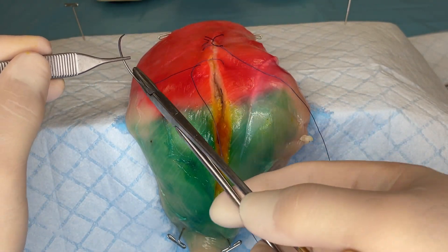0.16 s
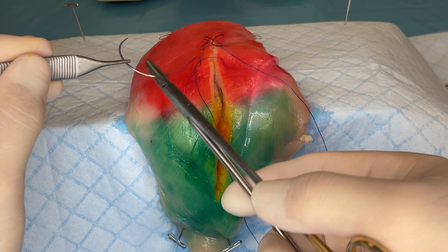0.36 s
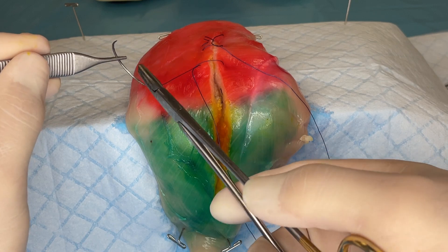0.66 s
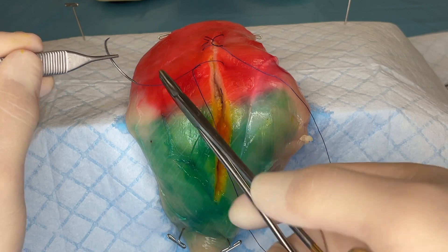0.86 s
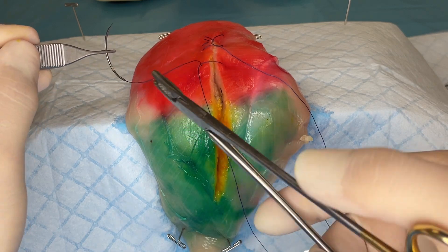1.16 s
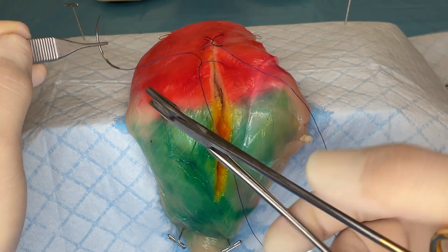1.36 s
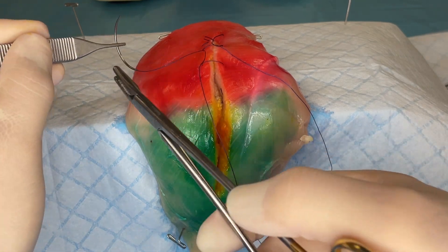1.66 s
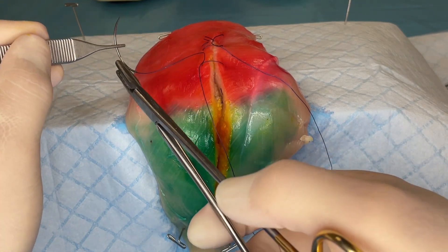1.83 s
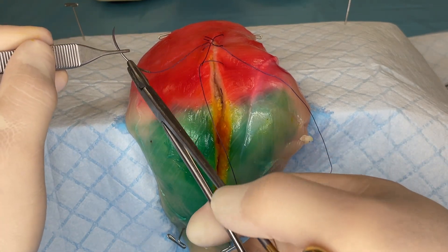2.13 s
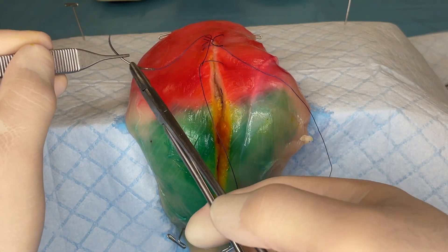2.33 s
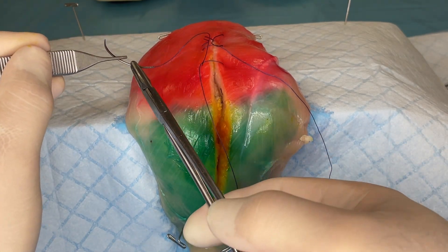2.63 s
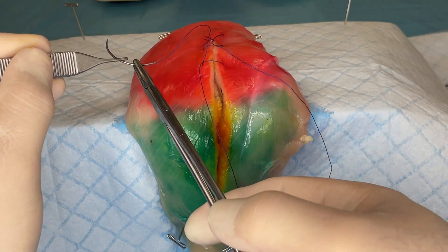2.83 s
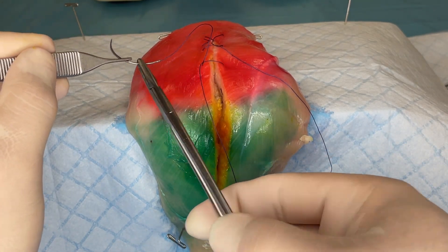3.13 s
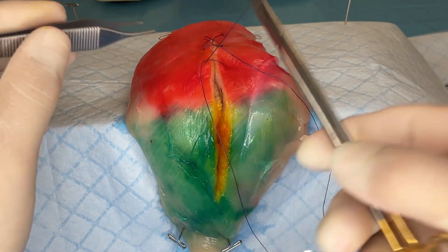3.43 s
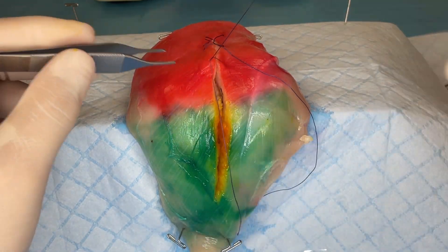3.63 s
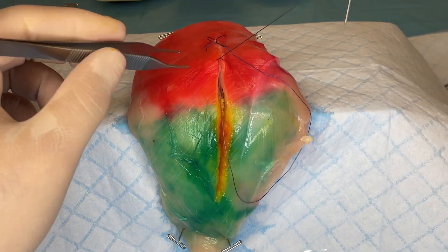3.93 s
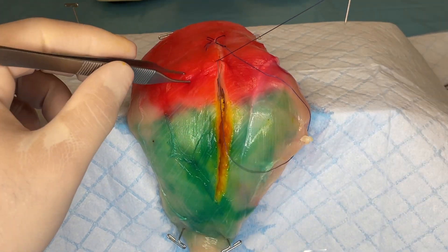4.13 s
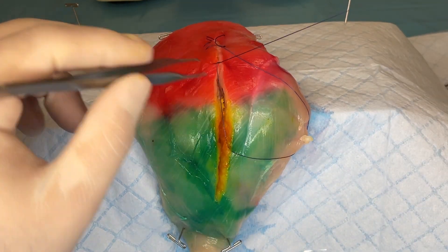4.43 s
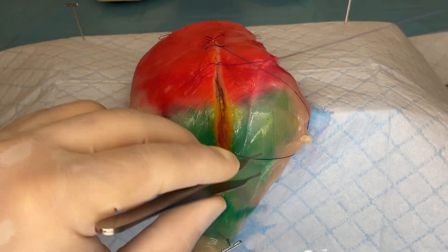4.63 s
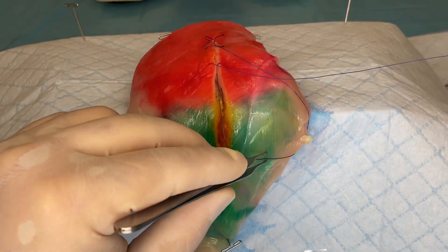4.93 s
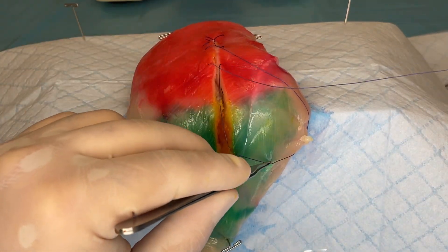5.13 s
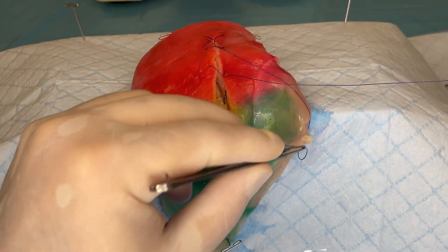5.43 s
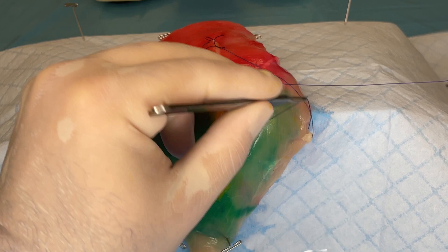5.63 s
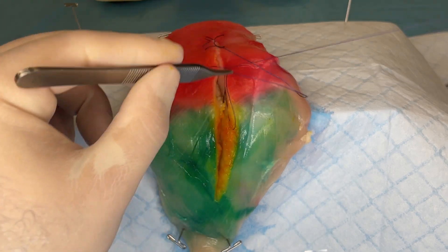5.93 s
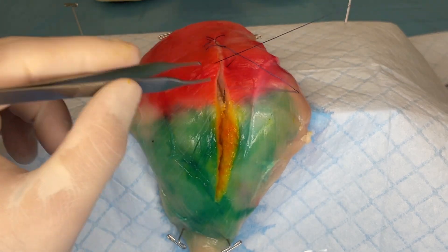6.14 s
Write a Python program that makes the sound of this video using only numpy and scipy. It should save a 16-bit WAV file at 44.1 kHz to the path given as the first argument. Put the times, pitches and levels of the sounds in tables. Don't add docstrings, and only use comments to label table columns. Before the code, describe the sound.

A close stereo phone microphone in a small quiet room, with faint hiss and soft low air rumble throughout. Tiny steel ticks open at 0 s; a short squeak and scrape at 0.2 s with low buffets around 0.3-0.4. A sharp click lands at 0.59, then the loose joint rattles from 0.7 to 0.9. Duller metal knocks and a scrape follow at 0.97-1.14, then near stillness. Light ticks return at 2.07-2.17, with low bumps at 2.2-2.4, bright clicks at 2.36-2.4 and another near 2.76. Small clicks at 3.14 lead into two hard, ringing ratchet snaps at 3.20 and 3.25, a softer one at 3.32 and a fading scrape. Thread rubs with a thin high hiss from 3.45 to 4.05. A heavy low buffet thumps at 4.02, with sleeve brushing around it and dull padded pats at 4.4-4.55 and 5.04. Soft cloth drags at 5.2-5.7; faint ticks at 5.87 and 6.13 end it.

```python
import sys
import numpy as np
from scipy import signal
from scipy.fft import rfft, irfft
from scipy.io import wavfile
from scipy.ndimage import uniform_filter1d

SR = 44100
rng = np.random.default_rng(int(sys.argv[2]) if len(sys.argv) > 2 else 0)


def invert_db(level):
    return 10 ** (np.asarray(level, dtype=float) / 20)


def output_pcm(signal):
    pcm = np.clip(np.atleast_2d(signal).T, -1, 1) * 32767
    wavfile.write(sys.argv[1], SR, np.round(pcm).astype(np.int16))


N = 277389


def shape(points):
    hz, value = np.transpose(points)
    return np.interp(np.log(np.fft.rfftfreq(N, 1 / SR) + 1), np.log(hz), value)


def band(x, lo_hz, hi_hz, order=2):
    return signal.sosfilt(signal.butter(order, [lo_hz, min(hi_hz, .45 * SR)], "band", fs=SR, output="sos"), x)


def noise(lo_hz, hi_hz):
    x = band(rng.standard_normal(N), lo_hz, hi_hz, order=4)
    return x / x.std()


def unit(x):
    return x / np.sqrt(np.sum(x ** 2))


def decay(t, t60):
    return np.exp(-np.log(1000) * t / t60)


def mode(x, hz, t60):
    pole = np.exp(2j * np.pi * hz / SR - np.log(1000) / (t60 * SR))
    return signal.lfilter([1, -1], [1, -pole], x).imag


def add(out, piece, s):
    i = max(int(s * SR), 0)
    out[..., i:i + piece.shape[-1]] += piece[..., :N - i]


# frequency [Hz], level [dB per Hz].
AIR = [(150, -18.5), (220, -4.5), (300, -3), (650, -12), (1500, -20), (2750, -22), (6700, -28), (8200, -26),
       (11000, -32.5), (13500, -36.5), (16500, -48)]
# frequency [Hz], side minus mid [dB].
AIR_SIDE = [(200, -9), (380, -6), (700, -8.5), (1300, -5.5), (2000, -2), (2600, -20.5), (5000, -30)]


def air():
    level_db = -80
    above_rumble = np.fft.rfftfreq(N, 1 / SR) > 150
    mid, side = rfft(rng.standard_normal((2, N))) * invert_db(shape(AIR)) * above_rumble
    mid, side = irfft(mid, N), irfft(side * invert_db(shape(AIR_SIDE)), N)
    return np.array([mid, side]) * invert_db(level_db) / band(mid, 360, 16000).std()


# peak time [s], peak level [dB], flutter above the rumble [dB].
GUSTS = [(0.01, -48, -18), (0.308, -45, -19), (.42, -58, -16), (0.769, -53, -19), (.93, -73, -26),
         (1.029, -61, -32), (1.26, -54.5, -22), (1.488, -53.5, -5.5), (1.6, -50, -14), (2.21, -52.5, -4.5),
         (2.26, -32, -23), (2.44, -45, -17.5), (2.52, -47, -28), (2.66, -54, -27), (2.82, -53.5, -35),
         (2.99, -59, -35), (3.241, -52, 1), (3.398, -61.5, 0.5), (3.72, -58, -2.5), (4.084, -37.5, -16),
         (4.14, -36, -12), (4.26, -45.5, -23.5), (4.61, -75, -4.5), (4.72, -71, -14), (4.941, -62, -24.5),
         (5.08, -74.5, 1), (5.448, -54.5, -20.5), (5.66, -61.5, -6.5), (5.969, -63, -16.5),
         (6.28, -56, -9.5)]


def airflow():
    still_db, still_flutter_db, flicker_db = -57.5, -68.5, 2
    gust_rise_s, gust_fall_s = 0.046, 0.019
    shut_s, attack_s, hold_s, release_s, open_s = 4.32, 0.14, .13, 0.4, 5.27
    depth_db, upper_depth_db, flutter_share = -32.5, -11, 0.81
    t = np.arange(0, N + 64, 64) / SR
    shut = np.clip((t - shut_s) / attack_s, 0, 1)
    since_hold = np.maximum(t - shut_s - attack_s - hold_s, 0)
    shut_db = depth_db * shut * np.exp(-since_hold / release_s)
    restless = uniform_filter1d(uniform_filter1d(rng.standard_normal((2, len(t))), 40), 40) * 2.4
    low = invert_db(still_db + shut_db + flicker_db * restless[0])
    flutter = invert_db(still_flutter_db + flutter_share * shut_db + flicker_db * restless[1])
    for s, db, flutter_db in GUSTS:
        gust = invert_db(db) * np.exp(-((t - s) / np.where(t < s, gust_rise_s, gust_fall_s)) ** 2)
        low = np.hypot(low, gust)
        flutter = np.hypot(flutter, gust * invert_db(flutter_db))
    upper = low * invert_db(upper_depth_db * shut * np.clip((open_s - t) / attack_s, 0, 1))
    return [np.interp(np.arange(N) / SR, t, v) for v in (low, upper, flutter)]


# start [s], peak [dB], pitch [Hz], length [cycles].
BUFFETS = [(0.281, -31, 62, 3.9), (0.387, -33, 55.4, 3.1), (2.207, -35, 84, 13), (2.232, -29, 98.3, 5.3),
           (2.393, -33, 52.4, 2.4), (4.019, -12, 90, 3.18), (4.023, -25, 204, 3.4),
           (4.121, -36.5, 148.7, 2.2), (4.108, -22, 58.4, 4), (4.239, -35, 69.8, 4),
           (4.299, -38.5, 62.2, 3)]


def draught():
    low, upper, flutter = airflow()
    mid = low * noise(36, 68) + upper * invert_db(-8.0) * noise(68, 115)
    mid = mid + flutter * (noise(97, 210) + invert_db(-10.0) * noise(210, 340))
    side = low * invert_db(-17.0) * noise(42, 73) + flutter * invert_db(-9.0) * noise(160, 200)
    t, eddies = np.arange(SR // 4) / SR, np.zeros(N)
    for s, db, hz, cycles in BUFFETS:
        u = t * hz / cycles
        swell = (2.755 * u * np.exp(1 - 2.796 * u)) ** 3.2
        turns = hz * t * (1 + 1.127 * np.exp(-.5 * t * hz))
        add(eddies, invert_db(db - 5.5) * np.sin(2 * np.pi * turns) * swell, s)
    lag_ms = 0.53
    mid, side = mid + eddies, side + np.gradient(eddies) * SR * lag_ms / 2000
    low_cut = signal.butter(2, 47, "high", fs=SR, output="sos")
    return signal.sosfilt(low_cut, np.array([mid + side, mid - side]))


# start [s], length [s], level [dB].
BRUSH = [
    (-.1, 0.56, -67.5),
    (0.208, 0.053, -62.5),
    (3.4, 0.41, -65),
    (3.854, 0.23, -57.5),
    (4.09, 0.06, -63),
    (4.155, 0.15, -67),
    (5.196, 0.22, -63.5),
    (5.459, 0.29, -66),
]
# start [s], peak [dB], decay t60 [s], edge [dB].
PATS = [
    (4.027, -63, 0.05, -21.5),
    (4.425, -60.5, 0.14, -9.5),
    (4.504, -53.5, 0.092, -16.5),
    (4.545, -58, 0.14, -16.5),
    (5.042, -55, 0.068, -18),
]
# frequency [Hz], width [Hz], level [dB].
PAD = [(287, 95, 0.5), (367, 30, -7.5), (494, 47, -4.5), (604, 63, 0)]


def brush():
    t, out = np.arange(N) / SR, np.zeros(N)
    rub = noise(267, 340) + invert_db(-11.0) * noise(410, 596)
    for s, length, db in BRUSH:
        out = out + invert_db(db - 7) * np.sin(np.pi * np.clip((t - s) / length, 0, 1)) * rub
    t = t[:SR // 4]
    for s, db, t60, edge_db in PATS:
        force = rng.standard_normal(len(t)) * decay(t, t60) * (1 - np.exp(-t / 0.00235))
        thud = sum(invert_db(g) * unit(band(force, hz - w / 2, hz + w / 2)) for hz, w, g in PAD)
        thud = thud + invert_db(edge_db) * unit(band(force, 700, 2600))
        add(out, thud * invert_db(db) / np.abs(thud).max(), s)
    return out * invert_db(np.array([[1.2], [-1.2]]))


# frequency [Hz], level [dB], decay t60 [s].
ROOM = [(730, -47.5, 0.46), (1420, -48, .33), (2491, -56, 0.61), (4060, -46.5, 0.26), (6000, -47.5, 0.27),
        (11000, -49, 0.3), (14275, -48.5, 0.19)]


def room(x):
    t = np.arange(SR) / SR
    tail = 0
    for hz, db, t60 in ROOM:
        wash = band(rng.standard_normal(SR), hz / 1.7, hz * 1.1) * decay(t, t60)
        tail = tail + invert_db(db) * wash * (1 - np.exp(-t / .004))
    return signal.fftconvolve(x, tail)[:N]


# time [s], strength of pull [dB].
THREAD = [
    (3.44, -100),
    (3.498, -76),
    (3.58, -73.5),
    (3.654, -82.5),
    (3.73, -72.5),
    (3.8, -81),
    (3.88, -75.5),
    (3.96, -79),
    (4.06, -100),
]
# frequency [Hz], width [Hz], level [dB].
THREAD_RINGS = [(2547, 260, -5), (5898, 400, -5.5), (8060, 3000, 2), (8900, 150, -7), (9700, 300, -6.5),
                (11006, 2500, -10), (14200, 500, -12)]


def thread():
    sing_hz, rise_hz, taut_s, sing_db = 7100, 520, 0.54, -3
    rub_db, rub_fade_db_s = -1, 37
    s, db = np.transpose(THREAD)
    t = np.arange(N) / SR
    since = np.clip(t - s[0], 0, 1)
    hz = sing_hz + rise_hz * np.sin(np.pi / 2 * np.clip(since / taut_s, 0, 1))
    rough = invert_db(sing_db + 4.1 * noise(7.7, 40)) * noise(4, 170)
    sing = rough * np.sin(2 * np.pi * np.cumsum(hz) / SR)
    rub = 0
    for ring_hz, width, ring_db in THREAD_RINGS:
        fitful = invert_db(ring_db + 3.3 * noise(4.5, 22) + 3.5 * noise(30, 150))
        rub = rub + fitful * noise(ring_hz - width / 2, ring_hz + width / 2)
    pull = invert_db(np.interp(t, s, db, -150, -150))
    return pull * (sing + invert_db(rub_db - rub_fade_db_s * since) * rub)


# start [s], length [s], level [dB], slip rate [Hz].
SQUEAKS = [(0.214, 0.049, -70.5, 2314), (0.274, 0.026, -83.5, 2300), (0.41, 0.034, -79, 11300),
           (0.602, 0.15, -91.5, 11900), (0.796, 0.057, -90, 11600), (0.863, 0.041, -72.5, 11600),
           (1.104, 0.049, -72, 11750), (0.591, .035, -69.5, 2300), (2.073, 0.056, -84, 15300),
           (2.27, 0.037, -92, 15300), (2.931, 0.037, -93, 15160), (3.849, .125, -101, 15200),
           (4.02, 0.027, -91, 12000), (4.9, .11, -90, 14200), (5.04, .11, -99, 15200),
           (5.187, .11, -95, 15270), (4.903, .02, -90, 11310), (4.97, 0.058, -83, 11410),
           (5.188, 0.042, -90, 11560), (6.13, 0.017, -88, 11380)]


def squeaks():
    out, t = np.zeros(N), np.arange(SR // 8) / SR
    for s, length, db, hz in SQUEAKS:
        uneven_db = 6.2 * np.repeat(rng.standard_normal(SR // 800 + 1), 100)[:SR // 8]
        slips = rng.standard_normal(SR // 8) * invert_db(uneven_db)
        slips = slips * np.sin(np.pi * np.clip(t / length, 0, 1))
        tone = band(slips, hz / 1.025, hz * 1.025)
        if hz < 8000:
            tone = tone + invert_db(-12.5) * band(slips, hz * 1.9, hz * 2.05)
        add(out, invert_db(db) * unit(tone) * np.sqrt(length * SR), s)
    return out


# start [s], peak [dB], treble [dB per octave], contact [ms].
JIGGLES = [(.6873, -44.5, -7, 1.6), (0.71, -45.5, 5, 1.7), (0.7115, -50, 9, 1.84), (0.7857, -44.5, 13, 1.4),
           (0.79, -51, 3, 2.7), (.8264, -66, 12, 3.5), (0.874, -60, 10, 3), (.8889, -50, 9, 1.3),
           (.894, -55, 2, 1.6), (0.901, -57, 2, 1.5), (0.9137, -47, -5.5, 1.9), (.919, -60, -3, 2.5),
           (2, -59, 5, 1.5), (2.044, -67, 14, 1.7), (2.134, -65, 8, 1.7), (2.232, -66, 8, 2.2),
           (2.774, -60, 4, 2), (2.887, -65, 8, 3)]
# frequency [Hz], width [Hz], level [dB].
JOINT = [(3300, 380, -18), (5190, 280, -2), (7700, 450, -7), (8360, 500, 4.5), (11060, 430, -3),
         (11900, 320, 5), (13700, 900, -27), (16000, 400, -17)]


def joint():
    out, t = np.zeros(N), np.arange(SR // 32) / SR
    for s, db, tilt_db, ms in JIGGLES:
        u = t / (ms * .001)
        force = rng.standard_normal(len(t)) * u * np.exp(-u / .6)
        ring = 0
        for hz, width, g in JOINT:
            level = invert_db(g + tilt_db * np.log2(hz / 8000))
            ring = ring + level * unit(band(force, hz - width / 2, hz + width / 2, order=1))
        add(out, ring * invert_db(db) / np.abs(ring).max(), s)
    return out


# frequency [Hz], width [Hz], level [dB].
STEEL = [(468.3, 130, -25), (700, 590, -17), (1361, 330, -18), (1620, 120, -16), (2110, 100, -16.5),
         (2512, 94, -0.5), (2880, 182.6, -10.5), (3570, 300, -8.5), (4500, 250, -3), (5000, 520, -7.5),
         (5280, 150, -15.5), (6150, 180, -7.5), (6960, 220, -2),
         (8600, 1400, -4.5), (8600, 350, -6), (9160, 300, -3.5), (10340, 460, -5.5), (11106, 320, -7),
        (11920, 270, -3), (12350, 96, 1.5), (12874, 150, -4), (14300, 210, -2.5), (15617, 130, -2.5)]


def steel(force, low_db, high_db):
    body = invert_db(1.5 - .4 * max(low_db, 0)) * unit(band(force, 2800, 9500))
    out = body + invert_db(high_db + 6.5) * unit(band(force, 9400, 11000))
    for hz, width, db in STEEL:
        weight, detune = rng.standard_normal(2)
        low_part = (low_db + 23.0) * np.clip(np.log2(4200 / hz), 0, 1.6)
        high_part = (high_db + 12.0) * (hz > 8000)
        level = invert_db(db + low_part + high_part + 2.0 * weight) * (width / 300) ** 0.32
        out = out + level * unit(mode(force, hz * (1 + 0.0025 * detune), 2.0 / width))
    return out


# start [s], length [s], level [dB], low ring [dB], high ring [dB].
SCRAPES = [(0.215, 0.045, -73, -18.5, -15.5), (0.283, 0.024, -83, -17, -8), (0.643, 0.032, -89, -25, 3),
           (0.81, 0.024, -94, -33, -6), (0.864, 0.066, -82, -29.5, 15), (0.963, 0.049, -68.5, 16, -37),
           (1.101, 0.035, -72, -12, -19.5), (2.364, 0.041, -62, -27, -24), (2.472, 0.036, -75.5, -26, 7),
           (3.336, 0.135, -71.5, -37, -23), (3.403, 0.13, -82, -26, -29), (4.989, 0.037, -75, -27, -21),
           (5.854, 0.052, -80.5, 4, -26)]


def scrapes():
    out = np.zeros(N)
    for s, length, db, low_db, high_db in SCRAPES:
        n = min(int(length * SR), SR // 8)
        force = rng.standard_normal(n) * invert_db(2.0 * rng.exponential(size=n)) * np.hanning(n)
        ring = steel(np.r_[force, np.zeros(500)], low_db, high_db)
        add(out, ring * invert_db(db) / ring.std(), s)
    return out


# start [s], level [dB], low ring [dB].
TEETH = [
    (3.1978, -20, -2.5),
    (3.2482, -25.5, 3.5),
    (3.322, -45.5, -1.5),
    (2.7572, -53.5, -3.5),
    (1.1048, -54.5, 5),
    (.5866, -44.5, 0),
]
# frequency [Hz], level [dB], decay t60 [s].
PAWL = [(814, -11, 0.013), (1400, -10.5, .012), (1650, -9.5, .015), (2522, -3.5, 0.027), (4490, -5, .018),
        (4980, -3.5, 0.01), (5430, -5, 0.013), (6110, 1.5, .016), (6980, -5.5, .022), (9320, -3.5, .012),
        (10505, -3, .01), (12470, 1, 0.02), (13500, 2.5, .01), (15623, -0.5, .022)]


def ratchet():
    out, t = np.zeros(N), np.arange(SR // 16) / SR
    rise_ms = .8
    onset = 1 - np.exp(-(t * 1000 / rise_ms) ** 2)
    for s, db, low_db in TEETH:
        ring = 0
        for hz, g, t60 in PAWL:
            tone = np.sin(2 * np.pi * hz * t + rng.uniform(0, 2 * np.pi))
            ring = ring + invert_db(g + low_db * (hz < 3000)) * tone * decay(t, t60)
        add(out, invert_db(db) * ring * onset, s)
    return out


# start [s], peak [dB], low ring [dB], high ring [dB],
# strongest ring [Hz].
SNAPS = [(0.5816, -36, -25, -7.5, 7100), (0.5863, -18.5, -17, 6, 4900), (0.9742, -37, 18, -50, 1250),
         (0.9958, -65, 1, -5, 1730), (1.0228, -34.5, -41, -28, 5200), (1.1046, -30.5, -18.5, -15, 5350),
         (1.1365, -48.5, -16, -43, 7200), (2.167, -39.5, -28, -5.5, 4240), (2.364, -41, -18, -1, 4490),
         (2.3768, -30, -48, -8.5, 6800), (2.3865, -38, -43, -4.5, 4400), (2.7564, -36, -26, -2, 4400),
         (3.1366, -35, -18.5, -10.5, 5060), (3.176, -46, -29, -12.5, 5280), (3.1977, -4, -17, -10, 5300),
         (3.248, -8, -13.5, -8, 5600), (3.3215, -25.5, -15.5, -22, 5500), (5.8715, -47.5, -24, -37, 3704)]
# start [s], peak [dB], high ring [dB], strongest ring [Hz].
TICKS = [(.0044, -53.5, -19, 4140), (0.054, -49.5, 2, 7200), (0.3845, -67, -14, 5500),
         (0.427, -61, 0.5, 7260), (0.5572, -48, -4.5, 6960), (.5804, -52, -4, 6180),
         (0.5871, -32.5, -32.5, 3300), (1.0083, -51, -19, 4260), (1.039, -58, -23.5, 7000),
         (1.245, -64.5, -28.5, 2010), (2.0682, -46, 1, 6000), (2.0817, -53.5, -8, 6960),
         (2.0913, -46, -8.5, 5000), (2.2379, -59.5, -12, 4200), (2.4012, -37, -7, 4640),
         (2.4118, -58, -7, 4500), (2.4982, -50, -4, 6760), (2.75, -52.5, -12, 6070),
         (2.8602, -57, -20.5, 5130), (2.864, -52, -8, 6150), (2.8924, -58, -9, 4200),
         (3.969, -69.5, -30, 7170), (5.0003, -53.5, -12, 5600), (5.308, -76, 10, 6970),
         (5.739, -64, -0.5, 5000), (5.885, -52, -43, 2990), (6.128, -60, 1, 4010)]
# frequency [Hz], level [dB], decay t60 [s].
ARM = [(2525, -52, 0.3), (5900, -52, 0.1), (12800, -43.5, 0.28)]


def clicks():
    snap_ms, tick_ms, tick_low_db = 0.88, 0.83, -32.5
    arm_growth = 2.3
    out, blows, t = np.zeros(N), np.zeros(N), np.arange(SR // 32) / SR
    firm = [(*row, snap_ms) for row in SNAPS]
    light = [(s, db, tick_low_db, high_db, hz, tick_ms) for s, db, high_db, hz in TICKS]
    for s, db, low_db, high_db, ring_hz, ms in firm + light:
        u = t / (ms * 0.0014)
        chance = rng.standard_normal(len(t))
        force = chance * np.abs(chance) * u * np.exp(-u / 0.61)
        ring = steel(force, low_db, high_db)
        ring = ring + invert_db(5.0) * band(ring, ring_hz / 1.1, ring_hz * 1.2)
        if low_db > 10:
            ring = band(ring, 930, 4300) + invert_db(-7.5) * band(ring, 3000, 6700)
        add(out, ring * invert_db(db) / np.abs(ring).max(), s)
        add(blows, np.array([invert_db(arm_growth * db + np.clip(low_db + 16.0, -20, 0))]), s)
    linger = 0
    for hz, db, t60 in ARM:
        linger = linger + invert_db(db) / np.sin(np.pi * hz / SR) / 2 * mode(blows, hz, t60)
    return out + invert_db(3.0 * noise(20, 140)) * linger


# frequency [Hz], left lead [radians].
PORT_LEAD = [(0, 0), (300, -.4), (1100, -.5), (1600, .25), (5100, .2), (6400, -.6), (8200, -3.14),
             (11500, -6.28), (14200, -8.8), (14700, -9.4), (15550, -10.1), (22050, -10.1)]
# frequency [Hz], left minus right [dB].
PORT_TILT = [(100, 2.5), (400, 2.5), (2400, 1.5), (4400, 0)]


def ports(x):
    lead = np.interp(np.fft.rfftfreq(N, 1 / SR), *np.transpose(PORT_LEAD))
    half = np.exp(.5j * lead) * invert_db(shape(PORT_TILT) / 2)
    return irfft(rfft(x) * np.array([half, 1 / half]), N)


def scene():
    near = clicks() + joint() + scrapes() + squeaks()
    blurred = near * (0.64 + 0.83 * np.tanh(3 * noise(300, 1300)))
    teeth = ratchet()
    near, blurred = near + teeth, blurred + teeth
    tail = band(room(blurred), 150, 27000, order=6)
    hiss, spread = air()
    spread = spread + invert_db(-4) * band(room(near), 300, 2000, order=4)
    return ports(near + tail + thread() + hiss) + np.array([spread, -spread]) + draught() + brush()


def roll_off(x):
    return signal.sosfilt(signal.butter(12, 16900, fs=SR, output="sos"), x)


def record(dry):
    peak_hz, width_hz, peak_db, top_hz = 15400, 1300, 3, 15950
    capsule = dry + invert_db(peak_db) * band(dry, peak_hz - width_hz / 2, peak_hz + width_hz / 2)
    top_cut = signal.ellip(6, .3, 60, top_hz, fs=SR, output="sos")
    return roll_off(signal.sosfilt(top_cut, capsule))


dry = scene()
out = record(dry)
output_pcm(out)
```